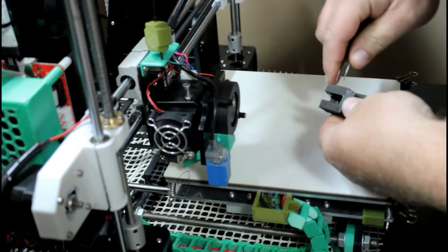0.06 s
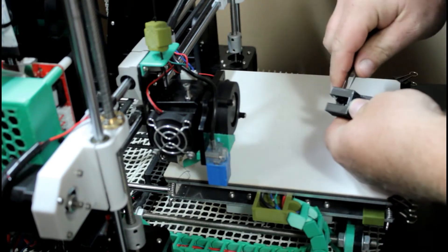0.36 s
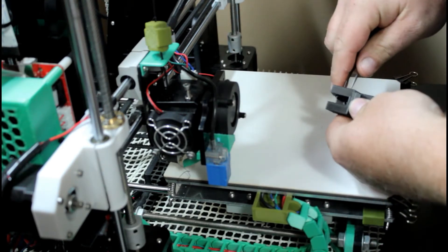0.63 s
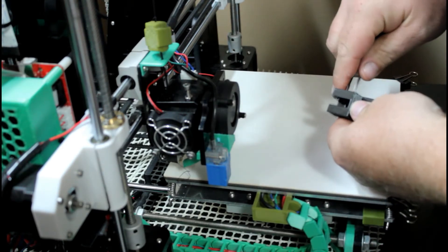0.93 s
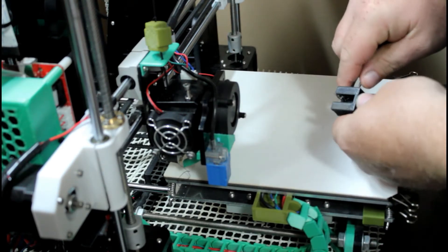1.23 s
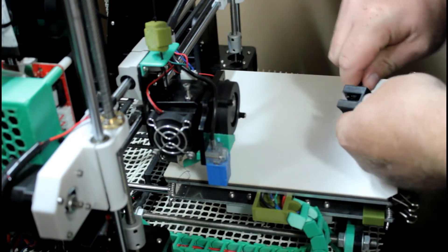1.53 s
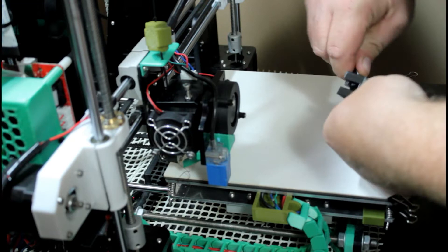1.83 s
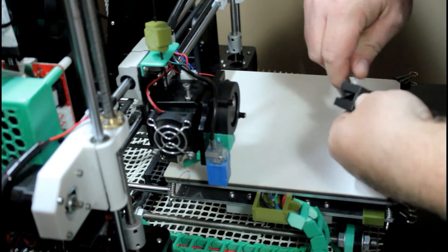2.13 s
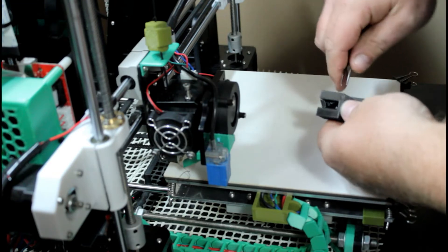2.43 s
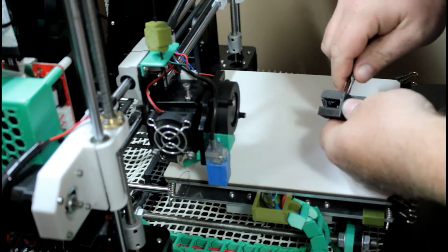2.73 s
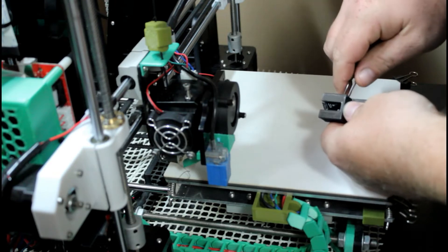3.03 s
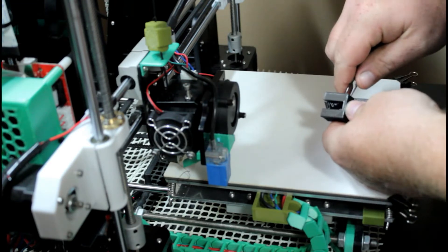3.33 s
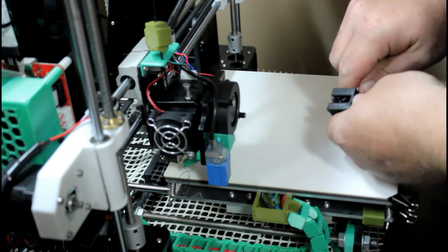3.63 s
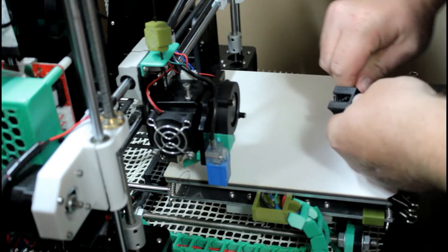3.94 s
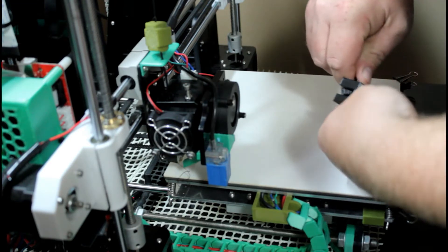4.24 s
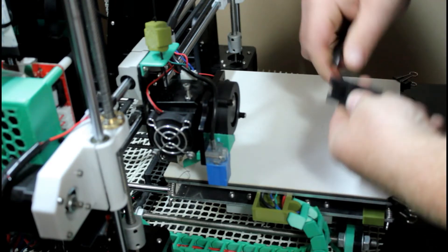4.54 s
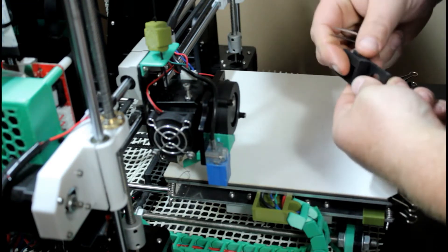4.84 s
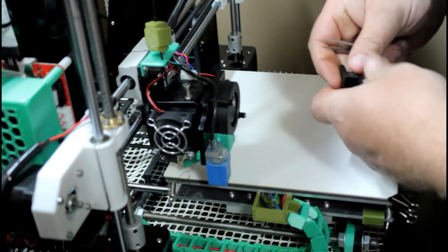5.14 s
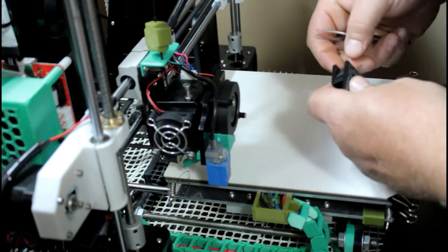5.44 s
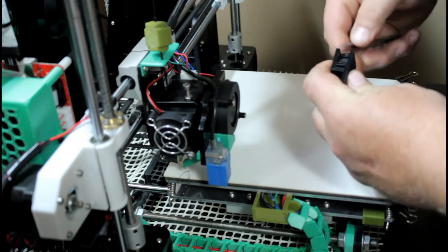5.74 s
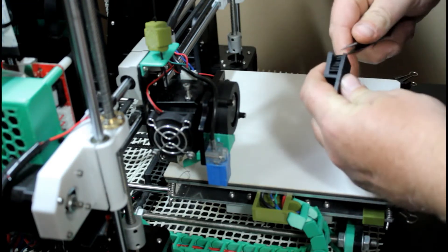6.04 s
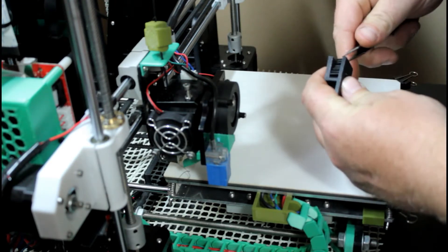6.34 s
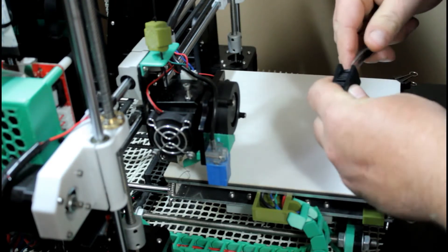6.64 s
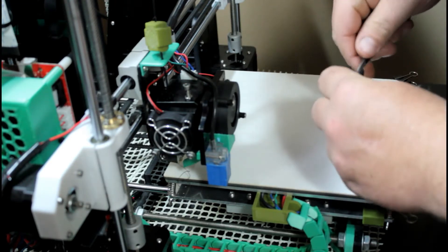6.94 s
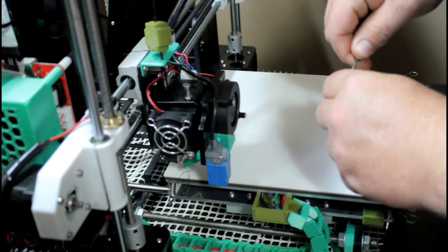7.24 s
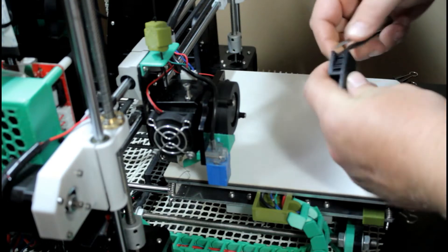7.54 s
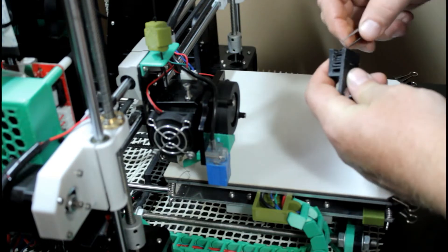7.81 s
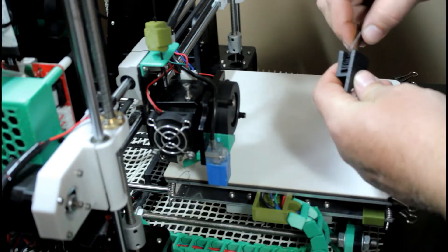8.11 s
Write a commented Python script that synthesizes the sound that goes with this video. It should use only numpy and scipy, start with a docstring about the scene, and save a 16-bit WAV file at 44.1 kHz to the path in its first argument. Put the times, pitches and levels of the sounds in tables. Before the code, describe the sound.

An idle 3D printer's fans whirr softly while a thin steel tool picks off plastic supports with crisp, scattered cracks.

```python
"""The fans of an idling 3D printer whirr steadily: rushing air, blade tones, a thin whine.
Over them a thin steel tool picks support struts off a small plastic part. Each strut is scratched,
cracks, crumbles for a few milliseconds and rings; the print bed and a small room answer.
One microphone, whose gain control sinks around each cluster of snaps and swells between them."""
import sys
import numpy as np
from scipy import signal
from scipy.fft import rfft, irfft, next_fast_len
from scipy.io import wavfile
from scipy.ndimage import uniform_filter1d, minimum_filter1d

SR = 44100
rng = np.random.default_rng(int(sys.argv[2]) if len(sys.argv) > 2 else 0)


def pcm_store(signal):
    """Save signal as 16-bit PCM."""
    levels = np.round(np.clip(np.atleast_2d(signal), -1, 1) * 32767)
    wavfile.write(sys.argv[1], SR, levels.astype(np.int16).T)


N = 360297


def from_db(db):
    """Decibels to gain."""
    return 10 ** (np.asarray(db) / 20)


def unit_rms(x):
    """Scale to rms 1."""
    return x / np.sqrt(np.mean(x ** 2) + 1e-20)


def unit_energy(x):
    """Scale to energy 1."""
    return x / np.sqrt(np.sum(x ** 2) + 1e-20)


def at_hz(points, hz):
    """Read a table on a log-frequency axis."""
    points_hz, values = np.transpose(points)
    return np.interp(np.log(np.maximum(hz, 1)), np.log(points_hz), values)


def band(x, low_hz, high_hz, order=2):
    """Causal band-pass."""
    sos = signal.butter(order, [low_hz, min(high_hz, .45 * SR)], "band", fs=SR, output="sos")
    return signal.sosfilt(sos, x)


def drift(rate_hz, hop=100):
    """Slow random wander, rms 1."""
    size = next_fast_len(N // hop + 2)
    hz = np.fft.rfftfreq(size, hop / SR)
    slow = unit_rms(irfft(rfft(rng.standard_normal(size)) / (1 + (hz / rate_hz) ** 2), size))
    return np.interp(np.arange(N) / hop, np.arange(size), slow)


# Air spectrum. Each row: frequency in Hz, relative density in dB.
AIR_SPECTRUM = [(25, -32), (60, -17), (110, -14), (210, -8), (350, -3), (650, -4), (1350, -1.5), (2200, 3),
                (3300, -3), (4700, -1.5), (6200, -7.5), (8500, -15), (12500, -17.5), (16000, -25)]
# Peaks and hollows of ducts, frame and electronics. Each row: centre in Hz, width in Hz, gain in dB.
DUCT_RESONANCES = [(163, 14, 9), (330, 31, 4), (2050, 79, 4), (2030, 40, 2.5), (3800, 66, -5),
                   (5120, 71, 5), (5240, 83, -4.5), (7100, 140, 2.5), (10470, 1200, 4), (13450, 450, 1.5)]


def air_rush():
    """Air through the fans: broad noise coloured by the ducts; rms 1."""
    size = next_fast_len(N)
    hz = np.fft.rfftfreq(size, 1 / SR)
    ducts_db = sum(db / (1 + (2 * (hz - centre_hz) / width_hz) ** 2)
                   for centre_hz, width_hz, db in DUCT_RESONANCES)
    spectrum = rfft(rng.standard_normal(size)) * from_db(at_hz(AIR_SPECTRUM, hz) + ducts_db)
    return unit_rms(irfft(spectrum, size)[:N])


def tones(lines, wobble, flutter_db=1.0):
    """Sines that waver together in pitch and separately in level."""
    warped_s = (np.arange(N) + wobble * np.cumsum(drift(rate_hz=2.99))) / SR
    out = np.zeros(N)
    for hz, db in lines:
        amplitude = np.sqrt(2) * from_db(db + flutter_db * drift(rate_hz=5.9))
        out += amplitude * np.sin(2 * np.pi * (hz * warped_s + rng.random()))
    return out


# Blade and motor tones. Each row: frequency in Hz, rms in dB re the whirr level.
BLADE_TONES = [(127.2, -11), (263.9, -16.5), (528, -14.5), (792.6, -12), (1056.8, -16), (1144.2, -11),
               (1585.3, -10), (1850, -17), (2289, -13.5), (3052, -19), (3560, -18)]
# Electronic whine with hum sidebands. Each row: frequency in Hz, rms in dB re the whirr level.
WHINE_TONES = [(13227, -33), (13356, -19), (13485, -29), (13738, -33), (13862, -30)]
# Whirr level. Each row: time in seconds, level in dB.
WHIRR_LEVEL = [(0, -46.5), (0.5, -43.5), (1.1, -42), (1.6, -42.5), (2.6, -41), (3.6, -42), (4.5, -39.5),
               (5.6, -42), (6.3, -41.5), (7.7, -41.5), (8.17, -44.5)]


def fans(air_db=3.5):
    """Nearly steady whirr of air, blades and electronics."""
    air = from_db(air_db) * air_rush()
    blades = tones(BLADE_TONES, wobble=0.00119)
    whine = tones(WHINE_TONES, wobble=0.0003)
    level_db = np.interp(np.arange(N) / SR, *np.transpose(WHIRR_LEVEL))
    return from_db(level_db) * (air + blades + whine)


def clicks(size, per_s):
    """Impulses at random times, of random height."""
    return (rng.random(size) < per_s / SR) * rng.standard_normal(size)


def tool_scratch(length_s=0.027, rise_db=14.0):
    """The steel edge scrapes the printed layers, louder as pressure grows; energy 1."""
    before_s = np.arange(SR // 20)[::-1] / SR
    grains = clicks(len(before_s), per_s=4000)
    pressure = (before_s < length_s) * from_db(-rise_db * before_s / length_s)
    return unit_energy(band(grains * pressure, low_hz=6900, high_hz=12500))


def scatter(t, per_s, start_s, decay_s):
    """Delayed, fading clicks; energy 1."""
    return unit_energy(clicks(len(t), per_s) * (t > start_s) * np.exp(-t / decay_s))


def through(x, response):
    """Convolve, keeping the length; energy 1."""
    return unit_energy(signal.fftconvolve(x, response)[:len(x)])


def fracture(t, crumble_db, echo_db=-2.0):
    """A sharp crack, smaller ones as the last fibres part, and echoes off bed, frame and hands."""
    impulse = t == 0
    crack = impulse + scatter(t, per_s=18000, start_s=0.0001, decay_s=0.00085)
    crumble = 0.37 * from_db(crumble_db) * scatter(t, per_s=6000, start_s=0.0015, decay_s=0.0031)
    echoes = from_db(echo_db) * scatter(t, per_s=5400, start_s=0.0023, decay_s=0.0063)
    return through(crack + crumble, impulse + echoes)


def mode(t, hz, t60_s):
    """Damped oscillation; energy 1."""
    return unit_energy(np.cos(2 * np.pi * hz * t) * from_db(-60 * t / t60_s))


# Higher modes of the part. Each row: frequency in Hz, relative level in dB, T60 in seconds.
PART_MODES = [(6750, 7, 0.018), (6800, -8, 0.022), (8200, -20, 0.022), (8840, 18, 0.03), (9900, -19, .016),
              (11600, 4, 0.012), (11800, -6, .014), (12400, -10, .014), (14370, 20, 0.009),
              (15300, 24, 0.0091)]


def part_response(t, grip_detune=0.025, grip_spread_db=3.3, ring_db=-3):
    """A direct spike, then the ringing part; the grip shifts each mode's pitch and level."""
    ring = np.zeros(len(t))
    for hz, db, t60_s in PART_MODES:
        gain = from_db(db + grip_spread_db * rng.standard_normal())
        gripped_hz = hz * (1 + grip_detune * rng.standard_normal())
        ring += gain * mode(t, gripped_hz, t60_s)
    return (t == 0) + from_db(ring_db) * unit_energy(ring)


def strut_ring(t, hz, t60_s=0.0081, split=0.039):
    """A nearly square strut bends in two directions at slightly different pitches."""
    return mode(t, hz * (1 - split), t60_s) - mode(t, hz * (1 + split), t60_s)


def knock(force, strength_db, lowest_hz, base_db=-19.5, tap_below_db=-24):
    """The part's low knock: stronger when a loose hold lowers its pitch or the touch is a mere tap."""
    upper = unit_energy(band(force, low_hz=2160, high_hz=6050))
    lower = unit_energy(band(force, low_hz=503, high_hz=2300))
    loose_db = -25.0 * np.log2(lowest_hz / 5300)
    tap_db = 0.95 * max(tap_below_db - strength_db, 0)
    return from_db(base_db + loose_db + tap_db) * (upper + 0.22 * lower)


# A crack's middle, high and top bands. Each entry: band edge in Hz.
CRACK_EDGES_HZ = [7000, 10000, 13000, 16500]


def snap(strength_db, lowest_hz, ring_hz, ring_db, bright_db, crumble_db):
    """One strut breaks: its size sets the pitch; a more brittle break tilts toward the treble."""
    t = np.arange(SR // 18) / SR
    force = fracture(t, crumble_db)
    body = through(force, part_response(t))
    low_db = -5.5 - 0.6 * bright_db
    bands_db = (0, -0.5 + 0.48 * bright_db, -7.0 + bright_db)
    sound = sum(from_db(db) * unit_energy(band(body, low_hz, high_hz, order=3))
                for db, low_hz, high_hz in zip(bands_db, CRACK_EDGES_HZ, CRACK_EDGES_HZ[1:]))
    lowest_mode = through(force, mode(t, lowest_hz, t60_s=0.016))  # damped by the fingers
    low_band = unit_energy(band(body, lowest_hz, 1.26 * lowest_hz))
    sound += from_db(low_db) * unit_energy(lowest_mode + low_band)
    sound += from_db(ring_db) * through(force, strut_ring(t, ring_hz))
    # Below the lowest mode only the knock radiates.
    highpass = signal.ellip(5, 1, 40, 0.982 * lowest_hz, "high", fs=SR, output="sos")
    return unit_energy(signal.sosfilt(highpass, sound)) + knock(force, strength_db, lowest_hz)


# Strut breaks. Each row: start in seconds, strength in dB, the part's lowest mode in Hz,
# strut ring in Hz, its share in dB, brightness in dB, crumbling in dB.
STRUT_BREAKS = [(0.2226, -42, 5140, 8200, -16, 2, -10), (1.373, -12, 6750, 11700, -8, 7, -1),
                (1.3895, 9, 6750, 8740, 4.5, 8.5, -9), (1.4095, 6.5, 6300, 11760, -7, 1, 8),
                (1.4597, 6, 6480, 9400, 1.5, -3, -12), (1.4715, -0.5, 6280, 11600, -10, 1, 0),
                (1.62, -37, 4930, 8200, -7, -7, 8), (1.6873, -12, 5350, 7980, 11, -13.5, -17),
                (1.806, -3.5, 5660, 8300, -0.5, 4.5, -2), (1.84, 1.5, 6440, 9200, -25, -1.5, 11),
                (1.8707, -20, 6100, 8200, -10, -18, -10), (1.955, -35, 5870, 7800, -3, 0, 1),
                (2.0147, -24, 6550, 8800, -13, -7, -5), (2.1163, -35.5, 5120, 8680, -14, -4, -4),
                (3.7108, -8.5, 5620, 8600, -4, -1, -1), (3.7272, 6.5, 6470, 11400, -1.5, 0.5, 12),
                (3.775, -1, 6900, 8300, -16, -1, 1), (3.7766, 1, 6600, 9300, -15, -2, -1),
                (3.916, -30, 8300, 8800, 2.5, -3, 2), (3.929, -22.5, 8130, 8650, -9, 0, 10),
                (3.936, -19.5, 7800, 8860, -5, 1, -4), (3.9826, -19, 8330, 8660, 5.5, -20, -5),
                (4.3418, -17, 5300, 12500, -10, 1, -9), (4.35, -19, 5800, 8800, -16, -6, 1),
                (4.359, -7, 5140, 6210, 1, 2.5, 16), (4.3625, -6, 5940, 9820, 2, -2, -8),
                (4.367, -6.5, 5330, 6900, -1, 2, 3), (6.809, -37.5, 4800, 12800, -10, 1, 12),
                (6.9209, -3.5, 5200, 8500, 0, 12.5, 5), (7.0084, -11.5, 5420, 8200, -8, 0, -11),
                (7.0104, -13.5, 5300, 8300, 5, 7, 10), (7.0736, -20.5, 5320, 8200, -4, -6, 7),
                (8.0495, -36, 4950, 11970, -10, 14, 14), (8.0715, -27.5, 5130, 12300, 4, -1, -2)]


def picked_struts(gain_db=26.0, scratch_db=-25.5):
    """The tool scratches each strut just before it snaps."""
    out = np.zeros(N + SR)
    for start_s, strength_db, *timbre in STRUT_BREAKS:
        scratch = from_db(scratch_db) * tool_scratch()
        sound = np.concatenate([scratch, snap(strength_db, *timbre)])
        at = max(int(start_s * SR) - len(scratch), 0)
        out[at:at + len(sound)] += from_db(strength_db + gain_db) * sound
    return out[:N]


# Room decay. Each row: frequency in Hz, T60 in seconds.
ROOM_DECAY = [(2000, 0.33), (8000, 0.15), (16000, 0.15)]


def room(x, wet_db=-14.5, onset_s=0.0085):
    """Short diffuse tail, dying sooner in the treble."""
    t = np.arange(SR // 2) / SR
    edges_hz = np.geomspace(1000, 17000, 8)
    tail = np.zeros(len(t))
    for low_hz, high_hz in zip(edges_hz, edges_hz[1:]):
        t60_s = at_hz(ROOM_DECAY, np.sqrt(low_hz * high_hz))
        tail += band(rng.standard_normal(len(t)), low_hz, high_hz) * from_db(-60 * t / t60_s)
    build_up = 1 - np.exp(-(t / onset_s) ** 2)
    return from_db(wet_db) * signal.fftconvolve(x, unit_energy(tail * build_up))[:N]


def peak_follow(db, release_db_per_s):
    """Instant attack, constant-rate release."""
    ramp_db = release_db_per_s * np.arange(N) / SR
    return np.maximum.accumulate(db + ramp_db) - ramp_db


def auto_gain_db(x, limit_db=-14.5, ceiling_db=-25.5, glide_db_per_s=8):
    """Keyed by the top band: a quick duck after loud snaps, a slow look-ahead glide down and back."""
    power = uniform_filter1d(band(x, *CRACK_EDGES_HZ[2:]) ** 2, size=441)
    level_db = 10 * np.log10(np.abs(power) + 1e-12)
    held_db = -minimum_filter1d(-level_db, size=441)  # 10 ms peak hold
    delayed_db = np.pad(held_db, (SR // 140, 0), mode="edge")[:N]
    duck_db = peak_follow(np.maximum(delayed_db - limit_db, 0), release_db_per_s=59.5)
    over_db = np.maximum(delayed_db - duck_db - ceiling_db, 0)
    after_db = peak_follow(over_db, glide_db_per_s)
    ahead_db = peak_follow(over_db[::-1], glide_db_per_s)[::-1]
    return -uniform_filter1d(duck_db + np.maximum(after_db, ahead_db), size=133)


def scene():
    """Fans, struts and room at one microphone, the same in both channels."""
    struts = picked_struts()
    return np.tile(struts + room(struts) + fans(), (2, 1))


def record(dry, peak_limit=0.9, cutoff_hz=15800):
    """Gain control, peak limiter, steep low-pass."""
    levelled = dry * from_db(auto_gain_db(dry[0]))
    limiter_gain = np.minimum(1, peak_limit / (np.abs(levelled[0]) + 1e-9))
    smooth_gain = uniform_filter1d(minimum_filter1d(limiter_gain, size=21), size=21)
    lowpass = signal.ellip(10, .1, 80, cutoff_hz, fs=SR, output="sos")
    return signal.sosfilt(lowpass, levelled * smooth_gain)


dry = scene()
out = record(dry)
pcm_store(out)
```